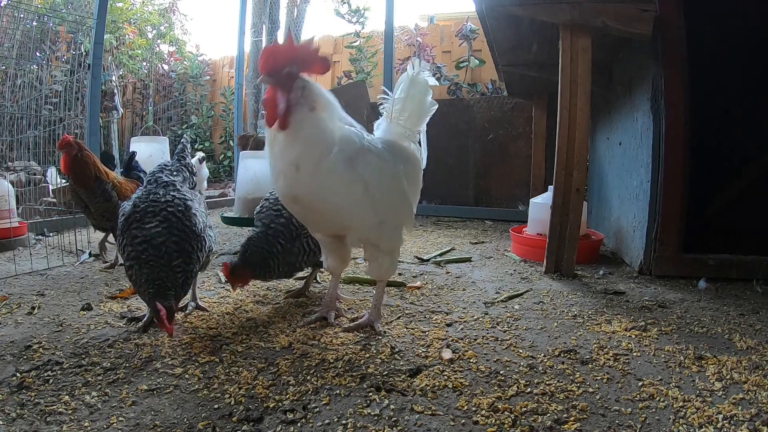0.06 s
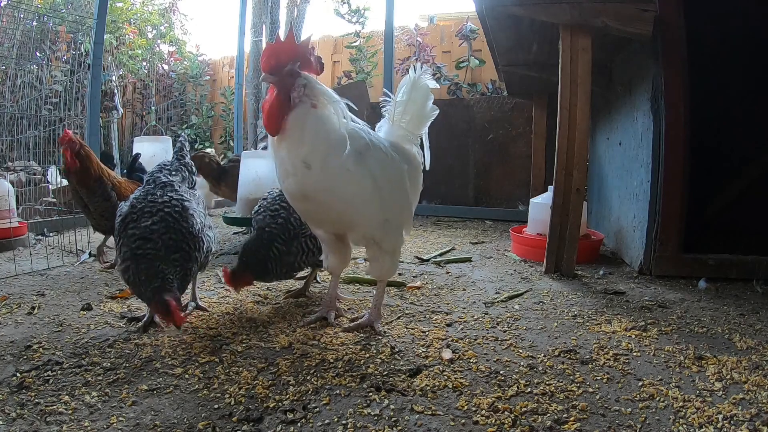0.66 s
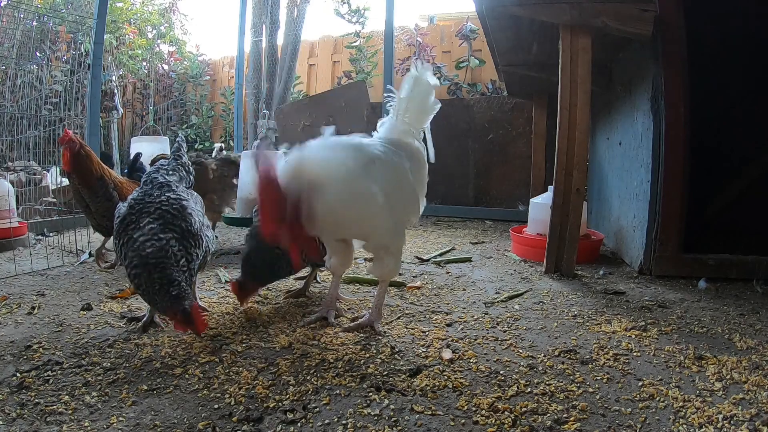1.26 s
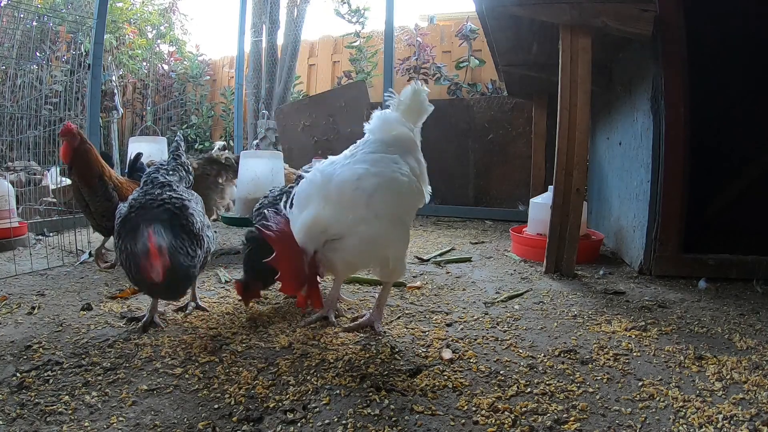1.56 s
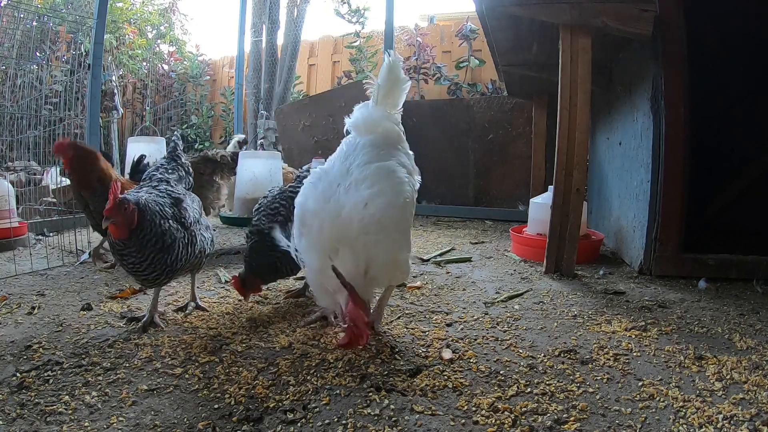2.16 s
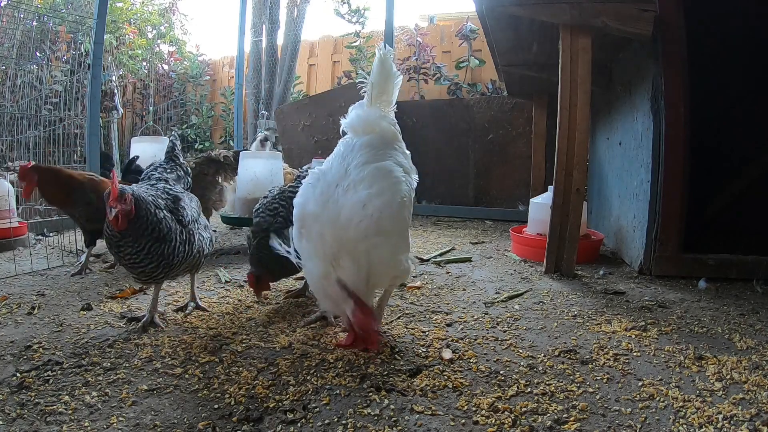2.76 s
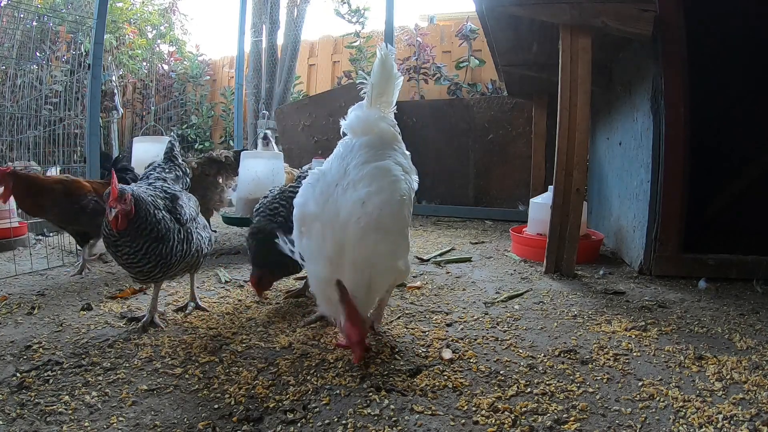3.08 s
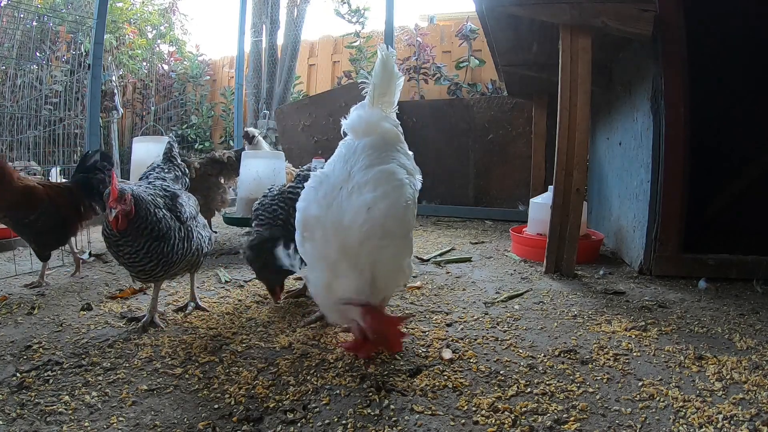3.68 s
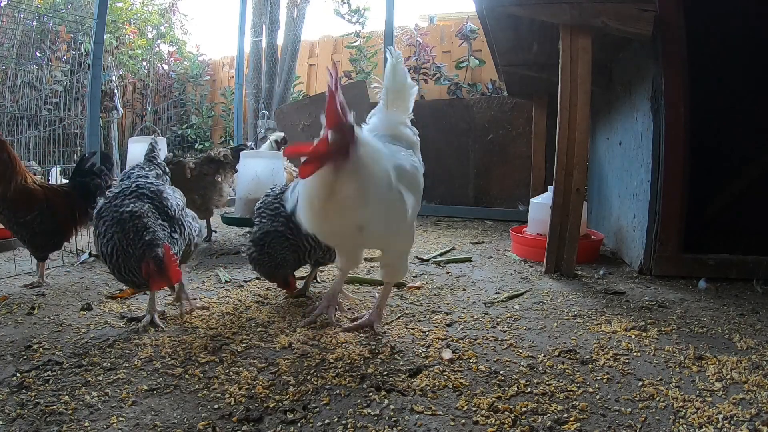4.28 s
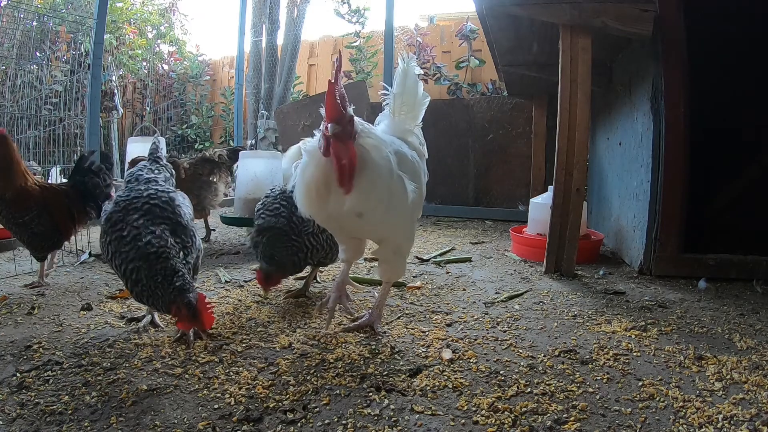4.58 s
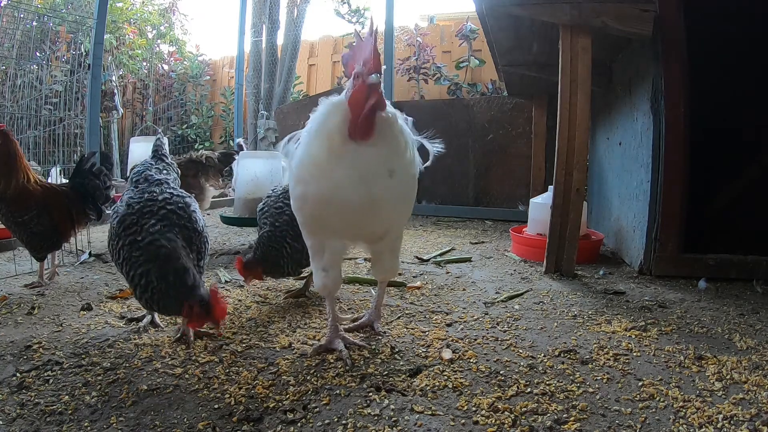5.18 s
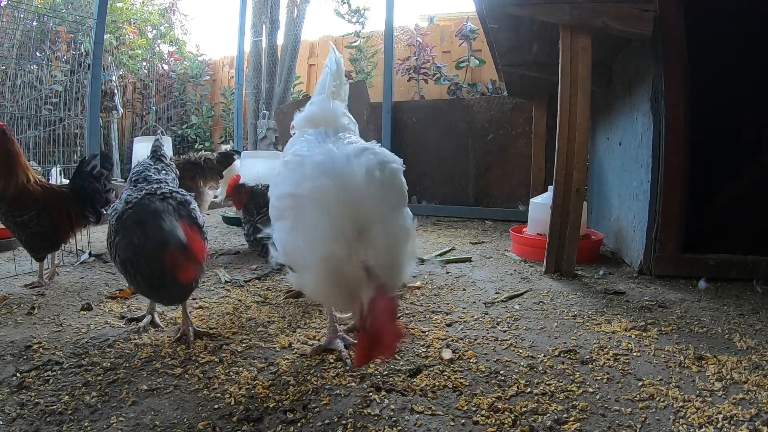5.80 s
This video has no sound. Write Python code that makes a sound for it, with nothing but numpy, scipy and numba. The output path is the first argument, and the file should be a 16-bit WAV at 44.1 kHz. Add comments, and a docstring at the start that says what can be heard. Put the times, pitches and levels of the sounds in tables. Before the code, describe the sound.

Hens peck at grain and rustle softly, close to the microphone in a backyard. A rooster then crows once, loudly: a short note, a long rasping and fluttering one, then a cleaner held note that ends in a croak. The fence and sheds add a brief ring. One soft cluck follows, and the faint pecking and rustling return over a steady low outdoor rumble.

```python
"""Rooster crowing in a backyard

A rooster crows by blowing air past thin membranes in its voice box: a short note, a long rasping
and fluttering one, then a clean held note that ends in a croak. The fence and sheds add a short
ring. Close by, hens peck at grain and rustle over a low outdoor rumble."""
import sys
import numpy as np
from scipy import signal
from scipy.fft import rfft, irfft, next_fast_len
from scipy.io import wavfile
from scipy.ndimage import uniform_filter1d
from numba import njit

SR = 44100
rng = np.random.default_rng(int(sys.argv[2]) if len(sys.argv) > 2 else 0)


def waveform_to_disk(signal):
    """Save audio, clipped to [-1, 1], as 16-bit WAV at the path in sys.argv[1]."""
    frames = np.transpose(np.atleast_2d(signal))
    scaled = np.clip(frames, -1, 1) * 32767
    samples = np.round(scaled).astype(np.int16)
    wavfile.write(sys.argv[1], SR, samples)


N = 257544
T = np.arange(N) / SR
LEFT_RIGHT = np.array([[1], [-1]])

# the high ringing of the windpipe: frequency_hz, gain_db
WINDPIPE = [(4700, -8), (5300, 6), (5750, -8.5), (6400, 8), (6950, -2.5), (7450, -9.5), (8600, 2),
            (9300, -11), (10000, -2.5), (10700, -14), (12200, -28), (14000, -16.5), (15000, -38)]
# the tone colour of the croak and of the breath in the held note: frequency_hz, gain_db
CROAK_COLOUR = [(240, -79.5), (400, -48.5), (644, -1), (962, -10), (1180, -13.5), (1600, -21.5),
                (1940, -11.5), (2210, -18), (2650, -11), (2850, -37.5), (3670, -19.5), (4390, -61.5),
                (5090, -44), (9940, -43.5), (14000, -65.5)]


def undb(db):
    """Turn decibels into a gain."""
    return 10 ** (np.asarray(db) / 20)


def unit(x):
    """Scale to an average (rms) level of 1."""
    return x / np.sqrt(np.mean(x ** 2))


def steady(x):
    """Even out slow level changes, keeping the fast grain."""
    return x / np.sqrt(uniform_filter1d(x ** 2, size=1300) + 1e-12)


def colour(x, points, tilt_db=0):
    """Filter by (frequency_hz, gain_db) points, tilted by tilt_db per octave above 1 kHz."""
    hz, db = np.transpose(points)
    size = next_fast_len(len(x), True)
    octave = np.log2(np.maximum(np.fft.rfftfreq(size, 1 / SR), 1))
    gain_db = np.interp(octave, np.log2(hz), db) + tilt_db * np.maximum(octave - np.log2(4000), -2)
    return irfft(rfft(x, size) * undb(gain_db), size)[:len(x)]


def band(x, low_hz, high_hz):
    """Keep the sound between two frequencies."""
    return signal.sosfilt(signal.butter(5, [low_hz, high_hz], "band", fs=SR, output="sos"), x)


def noise():
    """White noise."""
    return rng.standard_normal(N)


def wander(hz):
    """A random wobble of size about 1, up to a given speed."""
    return unit(signal.sosfilt(signal.butter(2, hz, fs=SR, output="sos"), noise()))


def gate(start, end, attack_s, release_s):
    """Fade in at the start and die away after the end."""
    return np.clip((T - start) / attack_s, 0, 1) * np.exp(-np.maximum(T - end, 0) / release_s)


def during(start, end, slide_s=.022):
    """1 between two times and 0 outside, sliding in and out."""
    return np.clip(np.minimum(T - start, end - T) / slide_s + .5, 0, 1)


def curves(table):
    """Join (time_s, values...) rows into one curve per value."""
    times, *columns = np.transpose(table)
    return [np.interp(T, times, column) for column in columns]


def spells(table):
    """Turn (start_s, end_s, values...) rows into curves that are 0 between rows."""
    return sum(np.outer(values, during(start, end)) for start, end, *values in table)


def yard(x, mid_db, side_db, ring_s=0.25):
    """Add dense echoes from fence, sheds and ground, different at the two ears."""
    # treble is beamed away from the listener and arrives mostly as echoes: frequency_hz, gain_db
    scatter = [(1000, 0), (2000, 1), (4000, 4), (8000, 6)]
    t = T[:SR // 2]
    decay = undb(-60 * t / ring_s) * np.clip(t / .004, 0, 1)
    echoes = [unit(rng.standard_normal(len(t)) * decay) / np.sqrt(len(t)) for _ in range(2)]
    mid, side = (signal.fftconvolve(x, echo)[:N] for echo in echoes)
    return x + undb(mid_db) * colour(mid, scatter) + undb(side_db) * side * LEFT_RIGHT


def outdoors():
    """A swaying low rumble, alike in both ears, under a faint wide hiss of air."""
    # tone colours of the rumble and the air: frequency_hz, gain_db
    rumble = [(20, -12), (32, -13), (55, -0.5), (90, 0.5), (130, -8), (176, -9.5), (245, -20), (330, -26),
              (450, -35), (600, -49), (900, -72), (4000, -130)]
    air = [(250, -2), (450, 3.5), (850, 1.5), (1500, -6), (2500, -19), (5000, -22.5), (7800, -22),
           (10000, -29.5), (12000, -50), (15000, -65)]
    # how much the two ears differ: frequency_hz, gain_db
    spread = [(30, -28), (80, -32.5), (160, -23), (350, -10), (700, -1), (10000, -1)]
    mid, side = (undb(-39.5 + .5 * wander(4)) * unit(colour(noise(), rumble))
                 + undb(-62.5 + 0.94 * wander(5.4)) * unit(colour(noise(), air)) for _ in range(2))
    return mid + colour(side, spread) * LEFT_RIGHT


def rustling():
    """Hens' feet and feathers brush in dense little grains, with one soft cluck just after the crow."""
    # the brushes and, at 3.755 s, the cluck: start_s, length_s, level_db, tilt_db_per_octave
    rustles = [(0, 0.16, -60.5, 4.5), (0.073, 0.029, -50.5, -17), (0.317, 0.038, -63, 1),
               (0.407, 0.083, -61.5, 5.5), (0.596, 0.089, -68, 4.5), (0.876, 0.077, -62, 4),
               (0.98, 0.25, -69, 1.5), (1.309, 0.048, -59.5, 2.5), (3.755, 0.027, -43.5, -0.5),
               (3.93, 0.058, -65.5, 5.5), (4.23, 0.22, -71.5, 5), (4.45, 0.11, -70, 5),
               (5.026, 0.021, -64.5, 4), (5.165, 0.34, -72.5, 3), (5.511, 0.25, -64.5, 7.5)]
    # their tone colour: frequency_hz, gain_db
    rustle_colour = [(500, 10.5), (1500, 15), (3000, 4.5), (5500, -2), (8200, -2), (9500, -22),
                     (12000, -27), (15000, -36)]
    t = T[:SR // 2]
    sound = np.zeros(N + len(t))
    grains = noise() * undb(3.1 * wander(250))
    for start_s, length_s, db, tilt_db in rustles:
        first, age = int(start_s * SR), t / length_s
        burst = unit(colour(np.roll(grains, -first)[:len(t)], rustle_colour, tilt_db))
        swell = np.minimum(age / 0.25, 1) * np.exp(-age ** 2)
        sound[first:][:len(t)] += undb(db) * burst * swell
    return sound[:N]


def pecking(faint_per_s=4):
    """Beaks hit grain and ground: a tiny crack of contact, then a brief ring."""
    # the clearest taps: start_s, level_db, pitch_hz
    pecks = [(0.0528, -52, 7500), (0.0775, -48, 1980), (0.4215, -53, 3340), (0.558, -57, 2550),
             (0.6629, -60, 2260), (1.024, -53, 2190), (1.123, -50.5, 2970), (3.9679, -49, 2000),
             (4.2706, -57.5, 2835), (4.364, -44, 4320), (4.42, -53.5, 4120), (4.5256, -59.5, 2300),
             (4.6032, -55, 2120), (4.64, -56, 4600), (5.029, -47, 2070), (5.3065, -54, 3000)]
    chances = rng.uniform(-1, 1, (int(faint_per_s * T[-1]), 3))
    faint = [((when + 1) / 2 * T[-1], -63 + 2.5 * force, 2900 * 2 ** (.5 * pitch))
             for when, force, pitch in chances]
    t = T[:SR // 2]
    taps = np.zeros(N + len(t))
    for start_s, db, hz in pecks + faint:
        click = rng.standard_normal(len(t)) * np.exp(-t / 0.0024)
        ring = signal.lfilter(*signal.iirpeak(hz, 5, fs=SR), click) + 0.057 * click
        crack = rng.standard_normal(len(t)) * np.exp(-t / .0005)
        tap = ring / np.abs(ring).max() + undb(-11.5) * crack / np.abs(crack).max()
        taps[int(start_s * SR):][:len(t)] += undb(db) * tap
    return band(taps, 410, 12000)[:N]


def voice_box(hz, rough, alternate):
    """Membranes make uneven pulses, every other one weaker, with a puff of air each cycle."""
    waver = .006 * wander(70) + .007 * wander(500)  # blurs the high overtones
    jitter = .042 * rough * wander(330)
    phase = 2 * np.pi * np.cumsum(hz * (1 + waver + jitter)) / SR
    # the windpipe delays each overtone differently, so a pulse spreads over its cycle
    pulses = unit(sum(np.cos(k * phase + k * k * np.pi / 5) for k in np.arange(1, 19)))
    strength = (1 + alternate * np.cos(phase / 2)) * np.exp(0.5 * rough * wander(480))
    puffs = rough * noise() * (1 + np.cos(phase)) / 2
    return pulses * strength + puffs


def croak():
    """Air pressure falls; the pitch sags and beats against the held note's lingering echo."""
    hz, = curves([(3.625, 666.5), (3.643, 615), (3.665, 643.5), (3.69, 596)])
    beating = 1 + 1.1 * np.sin(2 * np.pi * 56 * T)
    source = voice_box(hz, rough=.55, alternate=0.15) * beating
    body = undb(-20) * unit(colour(source, CROAK_COLOUR, tilt_db=1.5))
    edge = undb(-40.5) * unit(band(colour(source, WINDPIPE, tilt_db=11.5), 5200, 15000))
    return body * gate(3.626, 3.655, 0.015, 0.0075) + edge * gate(3.57, 3.603, 0.044, 0.0082)


def held_note(start_s=2.715, end_s=3.632):
    """A clean vibration whose overtones swell, fade and briefly dip as it mixes with the yard's echoes."""
    # the course of the note: time_s, pitch_hz, overtone_level_db
    melody = [(2.76, 678.2, -25.5), (2.87, 661.4, -25), (2.94, 669.4, -24), (2.985, 676.3, -28.5),
              (3.035, 689, -27.5), (3.14, 668.5, -25), (3.22, 678.8, -30), (3.36, 682.8, -25.5),
              (3.43, 682.3, -26), (3.48, 683, -24), (3.55, 671.2, -27), (3.62, 657.2, -33.5)]
    # brief dips in the overtones: time_s, width_s, gain_db
    dips = [(2.967, 0.0067, -7.5), (3.125, 0.0064, -10), (3.42, 0.0099, -3.5), (3.508, 0.0074, -5)]
    # the lowest tone swells: start_db, middle_db, end_db
    lowest_db = (-34.5, -32, -24)
    # level shifts of tones at 2, 3, 4, 5-6 and 7-22 times the pitch: start_db, middle_db, end_db
    shifts = [(-4, -4, 0), (4, 4, 2), (-7, -7, 5.5), (-9, -11.5, -19), (-13.5, -15, -15)]
    # the windpipe's high ringing, sharper in this clean voice: frequency_hz, gain_db
    sharp_windpipe = [(4100, -29.5), (4600, -7.5), (5300, -17), (5900, -17), (6550, 5.5), (7200, -6.5),
                      (7850, -15), (8550, 4.5), (9200, -9), (9900, -9), (10700, -27), (11200, -18),
                      (12000, -28.5), (14800, -29.5)]
    # the lower part of that ringing rises during the note: time_s, frequency_ratio
    ring_rise = [(3.3, 1.036), (3.42, 1.12)]
    hz, overtone_db = curves(melody)
    rise, = curves(ring_rise)
    dip_db = sum(db * np.exp(-((T - time) / width) ** 2) for time, width, db in dips)
    stages = np.linspace(start_s, end_s, 3)
    levels_db = [np.interp(T, stages, lowest_db)]
    levels_db += [overtone_db + dip_db + np.interp(T, stages, db) for db in shifts]
    tremor = .0026 * wander(40) + .0011 * wander(400)
    phase = 2 * np.pi * np.cumsum(hz * (1 + tremor)) / SR
    tones = {k: np.sin(k * phase + rng.uniform(0, 2 * np.pi)) for k in range(1, 23)}
    edge = np.zeros(N)
    for k in range(7, 23):
        ratio = rise if k < 12 else rise[0]
        edge += undb(np.interp(k * hz / ratio, *np.transpose(sharp_windpipe))) * tones[k]
    groups = [tones[1], tones[2], tones[3], tones[4], tones[5] + tones[6], edge]
    flicker_db = [.3, 2.2, 2, 2.2, 2.2, 1.5]
    voice = sum(undb(db + depth * wander(23.6)) * unit(group)
                for db, depth, group in zip(levels_db, flicker_db, groups))
    breath = unit(colour(noise() * (1 + np.cos(phase)), CROAK_COLOUR, tilt_db=8))
    return (voice + undb(-56) * breath) * gate(start_s, end_s, 0.017, 0.022)


def rasp(easy_pitch_hz=901):
    """Two loud notes: rough, fluttering pulses ring the throat, brighter as the pitch rises."""
    # the two notes: start_s, end_s, attack_s, level_db, windpipe_gain_db
    notes = [(1.345, 1.487, 0.0058, -15, -31.5), (1.672, 2.713, 0.018, -14.5, -29)]
    # their course: time_s, pitch_hz, brightness_db
    melody = [(1.36, 785.4, -0.5), (1.385, 807.8, -5.5), (1.45, 839.7, -3.5), (1.49, 800.4, 0),
              (1.675, 849.8, 0), (1.72, 1034, 1), (1.77, 1052, 0), (1.83, 824.4, 3.5), (1.875, 839, 2),
              (1.96, 1000, 2.5), (2.005, 1001, 4.5), (2.04, 1062, 0.5), (2.20, 1018, 0), (2.26, 969.4, 0.5),
              (2.335, 968.2, -2.5), (2.36, 903.8, -1.5), (2.68, 916, -0.5), (2.74, 851, 0.5)]
    # the membranes vibrate unevenly: start_s, end_s, roughness, alternation, low_band_gain_db
    breaks = [(1.33, 1.372, 0.74, 0, -6.5), (1.455, 1.53, 0.73, 0.27, 1.5), (1.66, 1.708, 0.92, 0.75, 0.5),
              (1.792, 1.82, 1.1, 0.57, 0), (1.89, 1.947, 0.64, 0.43, 3), (1.985, 2.025, 0, 0.4, -5),
              (2.12, 2.245, 0, 0.15, 1.5), (2.265, 2.345, 0.18, .9, -13.5), (2.345, 2.80, 0.72, 0.49, -0.5)]
    # the pitch flutters: start_s, end_s, share_of_pitch
    flutters = [(2.025, 2.235, 0.04), (2.35, 2.78, .036)]
    # the throat's tone colour: frequency_hz, gain_db
    throat_colour = [(330, -33.5), (560, -29), (720, -8.5), (880, 1.5), (1150, -7), (1450, -5),
                     (1740, -16.5), (2010, 5), (2280, -8), (2560, -4), (2790, 0), (3050, -10), (3500, -11),
                     (4120, -2.5), (4480, -22), (4750, -37)]
    # its low, middle and upper bands: low_hz, high_hz, gain_at_easy_pitch_db, db_per_octave_of_pitch
    bands = [(297.4, 1110, -3, -8), (1230, 2374, -5, 21), (2000, 5000, -9.5, 18)]
    hz, bright_db = curves(melody)
    rough, alternate, low_db = spells(breaks)
    flutter_depth, = spells(flutters)
    flutter_hz = 31.5 * (1 + .15 * wander(20))
    swing = flutter_depth * np.sin(2 * np.pi * np.cumsum(flutter_hz) / SR)
    swing_db = 33.5 * swing  # the level flutters with the pitch
    source = voice_box(hz * (1 + swing), 0.09 + rough, 0.062 + alternate)
    throat = colour(source + 0.1 * noise(), throat_colour)  # the noise is rushing air
    octaves_up = np.log2(hz / easy_pitch_hz)
    low, middle, upper = (undb(db + slope * octaves_up + 2 * wander(38)) * steady(band(throat, *span))
                          for *span, db, slope in bands)
    voice = undb(low_db) * low + undb(bright_db) * (middle + upper)
    windpipe = colour(source + .18 * noise(), WINDPIPE)
    roar_db = 3.5 * during(2.41, 2.72)  # the long note closes with a harsher roar
    edge = undb(roar_db) * steady(band(windpipe, 4600, 15000))
    return sum(undb(db + swing_db) * (voice + undb(edge_db) * edge) * gate(start, end, attack, 0.018)
               for start, end, attack, db, edge_db in notes)


def scene():
    """The rumble, the hens and the crow together in the yard."""
    background = outdoors()
    hens = yard(rustling() + pecking(), mid_db=-9, side_db=-4.5)
    held = yard(held_note(), mid_db=-9, side_db=-6)
    loud = yard(rasp() + croak(), mid_db=-4.5, side_db=-4.5)
    return background + hens + held + loud


@njit
def gain_control(power_in, threshold, slope, attack_s, release_s):
    """A volume control that turns down when its own output passes a threshold."""
    gain, power = np.empty(len(power_in)), 0.
    for i in range(len(gain)):
        gain[i] = max(power / threshold ** 2, 1.) ** -slope
        now = power_in[i] * gain[i] ** 2
        power += (now - power) / (SR * (attack_s if now > power else release_s))
    return gain


def record(dry):
    """Turn everything down during the crow, round the highest peaks and cut the top treble."""
    power = np.mean(dry ** 2, axis=0)
    even = dry * gain_control(power, threshold=undb(-25), slope=.42, attack_s=.03, release_s=.2)
    rounded = even / (1 + (even / .55) ** 6) ** (1 / 6)
    return signal.sosfilt(signal.ellip(8, .2, 80, 15400, fs=SR, output="sos"), rounded)


dry = scene()
out = record(dry)
waveform_to_disk(out)
```